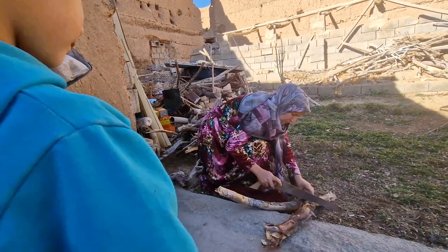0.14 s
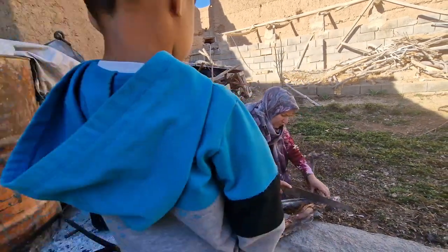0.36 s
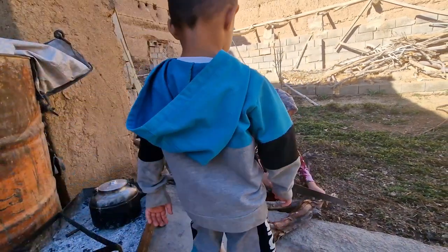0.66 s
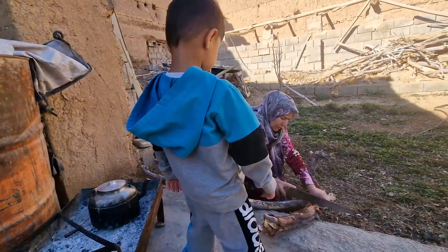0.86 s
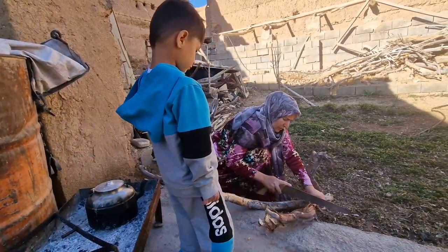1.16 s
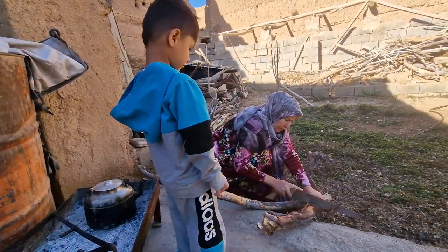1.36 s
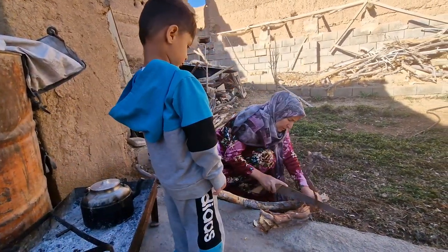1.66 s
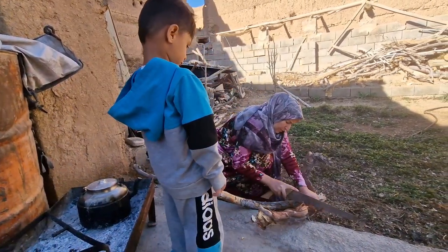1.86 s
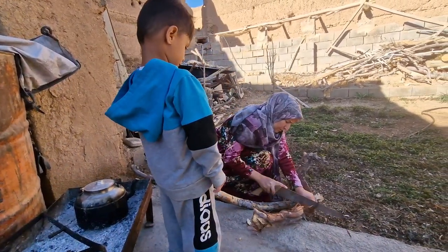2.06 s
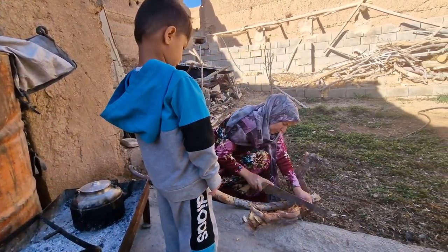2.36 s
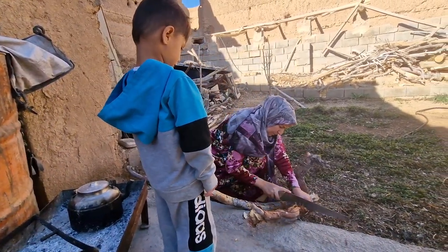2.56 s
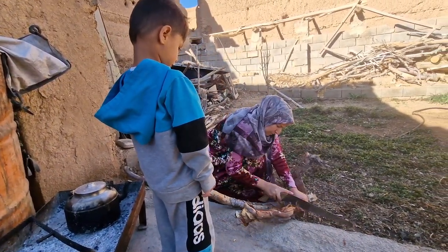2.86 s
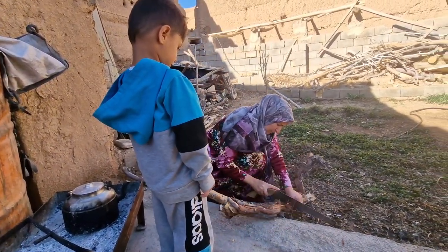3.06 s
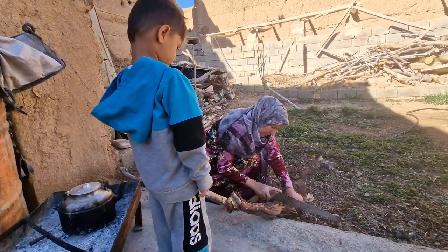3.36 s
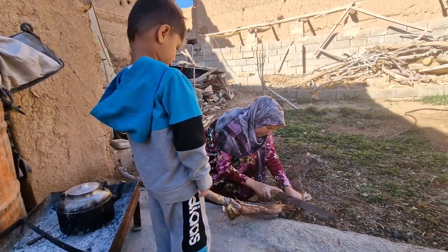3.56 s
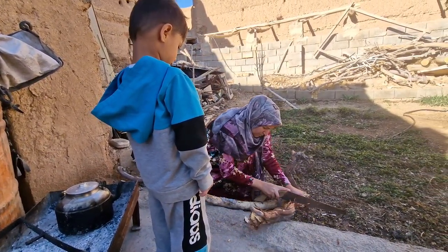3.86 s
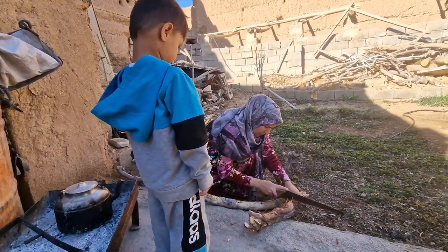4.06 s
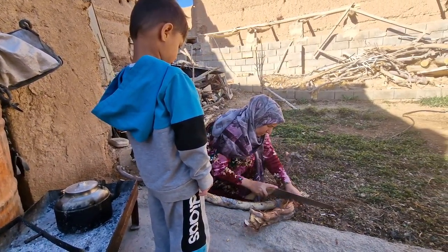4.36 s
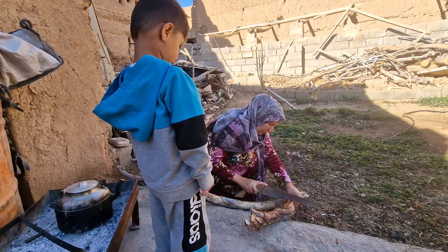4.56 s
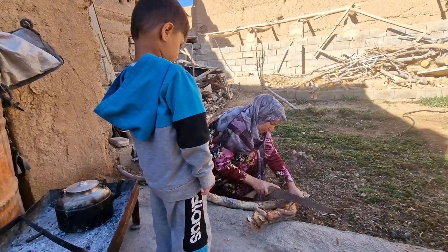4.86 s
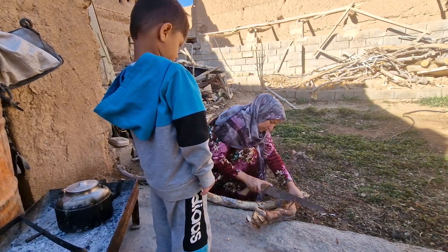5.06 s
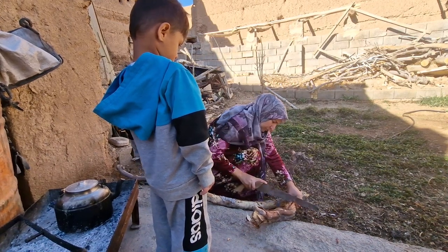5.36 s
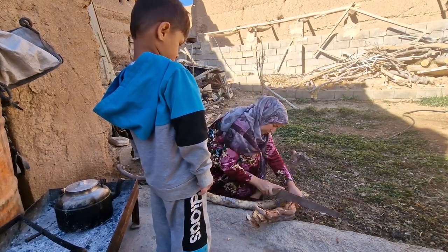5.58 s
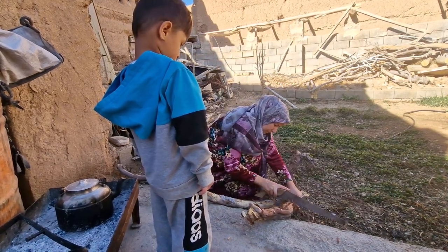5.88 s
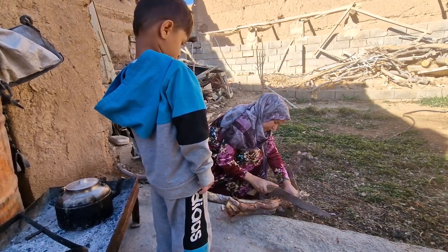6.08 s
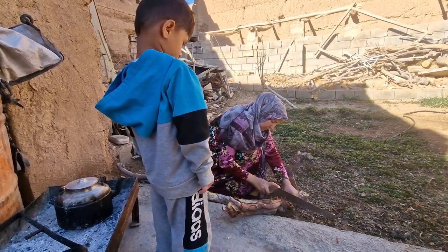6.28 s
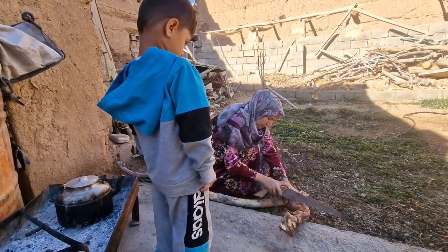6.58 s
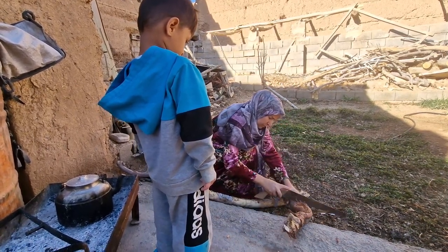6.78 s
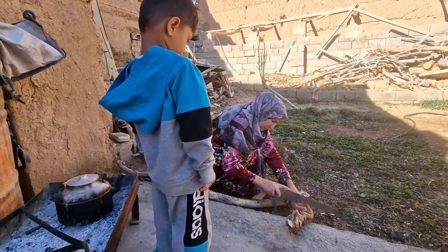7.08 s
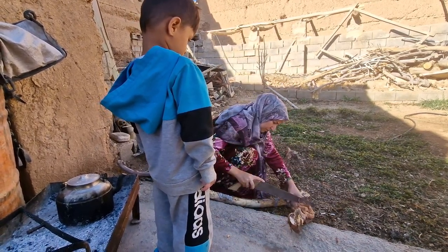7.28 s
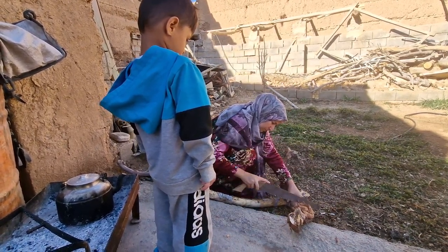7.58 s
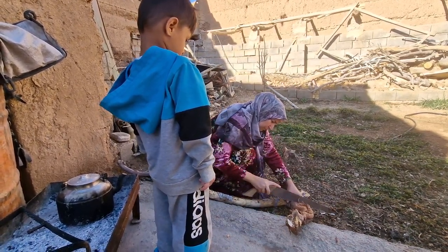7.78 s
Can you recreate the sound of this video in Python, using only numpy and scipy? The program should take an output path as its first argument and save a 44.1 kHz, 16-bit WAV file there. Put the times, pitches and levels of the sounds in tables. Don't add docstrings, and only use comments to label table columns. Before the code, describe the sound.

Close cloth rustle and bark ticks over a faint low wandering drone, then a hand saw rasps back and forth in a dry branch with sharp fibre cracks. It stops; the branch is shuffled and knocked on the slab. A second, firmer bout follows, then a cluster of hard woody knocks, a quiet gap and a final run of strokes. Walled yard, short reflections, small stereo microphone a few metres away.

```python
import sys
import numpy as np
from scipy import signal
from scipy.fft import rfft, irfft, next_fast_len
from scipy.io import wavfile
from scipy.ndimage import uniform_filter1d, map_coordinates

SR = 44100
rng = np.random.default_rng(int(sys.argv[2]) if len(sys.argv) > 2 else 0)


def dump(signal):
    limited = np.clip(np.atleast_2d(signal).T, -1, 1)
    pcm = np.round(limited * 32767).astype(np.int16)
    wavfile.write(sys.argv[1], SR, pcm)


def volts(x):
    e = np.asarray(x, float) / 20
    return 10 ** e


N = 349713

# start/s, length/s, blade level/dB, sawdust hiss over blade/dB
RETURN_STROKES = [
    (1.836, 0.16, -34.5, -0.5),
    (2.188, 0.19, -33.5, 0),
    (2.557, 0.16, -33.5, 2),
    (2.9, 0.13, -37, 1),
    (4.826, 0.18, -33, -2),
    (5.182, 0.18, -30.5, -5),
    (5.537, 0.14, -34.5, -1),
    (7.032, 0.24, -37.5, 0),
    (7.476, 0.19, -32, -1.5),
    (7.865, 0.2, -34, 1.5),
]


def unit(x):
    return x / np.sqrt(np.mean(x ** 2) + 1e-20)


def along(points, hz):
    f, v = np.transpose(points)
    return np.interp(np.log(hz + 1), np.log(f + 1), v)


def curves(rows):
    s, *cols = np.transpose(rows)
    return [np.interp(np.arange(N) / SR, s, c) for c in cols]


def wobble(rate):
    return map_coordinates(rng.standard_normal(4000 * 8), [np.arange(N) * rate / SR])


def filtered(x, response):
    m = next_fast_len(N + SR // 2)
    return irfft(rfft(x, m) * response(np.fft.rfftfreq(m, 1 / SR)), m)[..., :N]


def coloured(x, spectrum):
    return filtered(x, lambda hz: volts(along(spectrum, hz)))


def ringing(x, modes):
    def response(f):
        total = 0
        for k, (centre, width, db) in enumerate(modes):
            loss = 1j * f * width
            total = total + (-1) ** k * volts(db) * loss / (centre * centre - f * f + loss)
        return total
    return filtered(x, response)


def patchy(x, depth_db, size=(5, 9)):
    z = signal.stft(x, nperseg=512)[2]
    field = uniform_filter1d(rng.standard_normal(z.shape[1:]), size[0], axis=0)
    field = uniform_filter1d(field, size[1], axis=1)
    return signal.istft(z * volts(depth_db * unit(field)), nperseg=512)[1][:, :N]


def grit(bite_db, grain_db, bites, rate, ticks, tick_db):
    caught = (rng.random(N) < ticks / SR) * volts(tick_db * rng.random(N))
    swing = bite_db * np.tanh(bites / 2) * 2 + grain_db * wobble(rate)
    return unit(volts(swing) * (rng.standard_normal((2, N)) + caught))


def strokes(rows):
    speed, levels = np.zeros(N), np.full((3, N), -120.)
    cruise = 1
    for s, length, db, dust_db, lean, branch_db in rows:
        u = np.arange(round(length * SR)) / (length * SR)
        at = slice(round(s * SR), min(N, round(s * SR) + len(u)))
        skew = np.log(.5) / np.log(np.clip(lean, .15, .85))
        arm = np.tanh(cruise * np.sin(np.pi * u ** skew)) / np.tanh(cruise)
        speed[at] = arm[:at.stop - at.start]
        levels[:, at] = [[db + branch_db], [db], [db + dust_db]]
    return speed, levels


def motion(pushes, pulls):
    # share of the stroke before its loudest point, branch over blade/dB
    rows = [(*row, 0.63, -4.5) for row in pushes] + [(*row, 0.5, -6) for row in pulls]
    return strokes(sorted(rows))


def background():
    # t/s, level/dB
    drone_level = [(0.0, -88), (0.06, -63), (0.4, -72), (0.55, -44), (0.64, -66), (1.5, -53), (1.57, -45),
                   (1.61, -54.5), (3.03, -52.5), (3.07, -59), (5.37, -46.5), (5.43, -58.5), (5.5, -47.5),
                   (6.32, -53.5), (7.16, -47.5), (7.46, -54), (7.51, -49), (7.93, -63)]
    # f/Hz, level/dB
    hum_spectrum = [(20, -39), (45, -4), (72, 0), (110, -5), (200, -34.5)]
    # f/Hz, density/dB per Hz
    air_spectrum = [(59, -30.5), (100, -2), (135, -14.5), (219, -14.5), (322, -27), (415, -16.5),
                    (547, -52.5), (15000, -57.5), (16000, -55)]
    shaken_db, drift_db = 2.5, 1.5
    pitch_hz = 72 + 3.42 * wobble(9)
    line = np.sqrt(2) * np.sin(2 * np.pi * np.cumsum(pitch_hz) / SR)
    rumble = unit(coloured(rng.standard_normal((2, N)), hum_spectrum))
    return_speed = motion([], RETURN_STROKES)[0]
    level_db = curves(drone_level)[0] + shaken_db * return_speed + drift_db * wobble(4.04)
    drone = volts(level_db) * (volts(-2.0) * line * [[1], [.7]] + volts(-5.5) * rumble)
    return drone + volts(-67) * unit(coloured(rng.standard_normal((2, N)), air_spectrum))


def efforts():
    # loudest at t/s, swell/s, fade/s, rustle/dB, dull shuffle/dB
    moves = [(0.23, 0.36, 0.11, -45, -55.5), (0.327, 0.036, 0.14, -50, -67),
             (0.47, 0.18, 0.26, -59.5, -57.5), (0.7, 0.26, 0.16, -60, -77), (0.878, 0.16, 0.22, -43, -66),
             (1.12, 0.13, 0.058, -58, -83), (1.196, 0.12, 0.063, -36.5, -60), (2.7, 1.5, 0.51, -50, -62),
             (3.04, 0.35, 0.084, -48.5, -47), (3.21, 0.081, 0.059, -41, -55), (3.36, .1, .1, -74, -68),
             (3.6, 0.3, 0.075, -51, -62), (3.66, 0.061, 0.092, -48.5, -52.5),
             (3.75, 0.12, 0.14, -53, -53.5), (3.91, 0.31, 0.04, -49, -48.5), (4.03, 0.3, 0.81, -53, -59.5),
             (4.3, 0.54, 0.08, -83, -57.5), (4.38, 0.027, 0.12, -54, -50.5), (5.7, 1.1, 0.18, -53.5, -46.5),
             (5.906, 0.026, 0.13, -44, -37.5), (6.3, 0.13, 0.18, -62, -57), (6.82, .1, 0.044, -85, -59),
             (6.9, 0.034, .5, -56.5, -58.5), (7.5, 0.53, 1.5, -57, -52)]
    fade_db = 19.5
    t, power = np.arange(0, N / SR, .002), 0
    for s, swell, fade, rustle_db, shuffle_db in moves:
        loss_db = fade_db * np.maximum((s - t) / swell, (t - s) / fade)
        scuff_db = rustle_db - 8.5 - 0.37 * (shuffle_db - rustle_db)
        power = power + volts(np.array([[rustle_db], [shuffle_db], [scuff_db]]) - loss_db) ** 2
    return curves(np.vstack([t, np.sqrt(power)]).T)


def handling():
    # f/Hz, density/dB per Hz
    rustle_spectrum = [(710, -12), (1200, -14.5), (1490, -11), (2520, -9.5), (3300, -9.5), (6160, -6),
                       (9000, -8), (11700, -24.5), (19800, -120)]
    # f/Hz, density/dB per Hz
    shuffle_spectrum = [(65, -26.5), (110, -5.5), (176, -5.5), (307, -9.5), (481, -9.5), (1230, -24.5),
                        (1500, -54), (1950, -47), (3300, -120)]
    # f/Hz, density/dB per Hz
    scuff_spectrum = [(5290, -49), (9000, -13), (10400, -12.5), (13300, 5), (15100, 0), (16000, -9)]
    rustle_gain, shuffle_gain, scuff_gain = efforts()
    clumps = wobble(90)
    crackle = grit(2.6, 1.8, clumps, 700, ticks=70, tick_db=25)
    drag = grit(1.8, 2.2, clumps, 150, ticks=30, tick_db=20)
    rustle = rustle_gain * unit(patchy(coloured(crackle, rustle_spectrum), 2.8))
    scuff = scuff_gain * unit(coloured(crackle, scuff_spectrum))
    shuffle = shuffle_gain * unit(patchy(coloured(drag, shuffle_spectrum), 2.2))
    return rustle + shuffle + scuff


def knocks():
    # t/s, peak level/dB, note f/Hz, rattle over note/dB, thud over note/dB
    bumps = [(0.426, -39.5, 298, -9.5, -13), (0.537, -41.5, 280, -17, 7), (2.078, -24.5, 367, -12, -20),
             (2.679, -33, 626, 15, -10), (2.999, -24, 945, -11, -23), (3.037, -27, 393, -9, -14),
             (3.75, -35, 280, -3, -24), (4.382, -31, 423, -16, -27), (5.614, -17.5, 960, -15, -14),
             (5.629, -16, 287, -16, -12.5), (5.693, -23.5, 340, -9.5, -10.5), (5.92, -28, 564, -1.5, -33),
             (5.949, -26.5, 533, -8, -18), (5.99, -27.5, 1000, -0.5, -32), (6, -21.5, 986, -6.5, -11.5),
             (6.031, -24, 303, -11.5, -29), (6.066, -30, 383, -15, -11.5), (6.093, -28.5, 317, -19, -13),
             (6.291, -43.5, 270, -10, -4.5), (6.534, -25.5, 575, -11, -5), (6.572, -25, 270, -9, -5),
             (6.618, -34.5, 274, -5.5, -0.5)]
    # f/Hz, width/Hz, level/dB
    stub_modes = [(620, 250, -3), (1150, 300, -3), (1590, 300, 0), (1990, 350, -2), (3500, 700, -12)]
    body, rattle, t = np.zeros(N + SR), np.zeros((2, N + SR)), np.arange(SR // 5) / SR
    for s, db, hz, rattle_db, thud_db in bumps:
        thud_hz = 75 if s < 5 else 146.3
        at = slice(round(s * SR), round(s * SR) + len(t))
        note = volts(db - 60 * t / 0.025) * np.sin(2 * np.pi * hz * t)
        thud = volts(db + thud_db + 9.5 - 60 * t / 0.038) * np.sin(2 * np.pi * thud_hz * t)
        body[at] += note * (1 - np.exp(-t / 0.00092)) + thud * (1 - np.exp(-t / 0.0057))
        shake = volts(db + rattle_db - 60 * t / 0.018) * (1 - np.exp(-t / 0.0015))
        rattle[:, at] += shake * np.sign(rng.standard_normal((2, len(t))))
    return body[:N] + volts(20) * ringing(rattle[:, :N], stub_modes)


def snaps():
    # t/s, peak level/dB, crack pitch f/Hz
    fibres = [(1.1432, -11, 3660), (1.1776, -20, 5900), (1.498, -27.5, 3870), (1.5936, -22.5, 3680),
              (1.95, -19.5, 7360), (2.2164, -20, 6860), (3.0383, -31.5, 2980), (2.3303, -10, 6900),
              (2.3396, -16.5, 7850), (2.3414, -32, 7050), (2.36, -22, 7050), (2.364, -8.5, 5600),
              (2.3671, -15, 5670), (2.5783, -23, 6700), (2.6646, -19, 6200), (2.6774, -9.5, 3340),
              (2.6831, -15.5, 3350), (2.943, -24, 6820), (2.952, -8, 6250), (2.958, -18, 5700),
              (3.0091, -19.5, 7600), (5.694, -26.5, 6740), (5.916, -29, 6100), (5.919, -33, 7040),
              (5.9478, -30.5, 4200), (6.0002, -23.5, 5530), (6.005, -27, 2960), (6.536, -25.5, 7480),
              (7.222, -25.5, 4900), (7.497, -33, 6100)]
    # t/s, peak level/dB
    flakes = [(0.181, -38), (0.252, -37), (0.3286, -43), (0.832, -35), (0.875, -35), (0.9175, -36),
              (0.946, -37.5), (0.986, -34.5), (1.4555, -32), (1.855, -31), (3.081, -42), (3.247, -31.5),
              (3.404, -48), (3.5488, -40.5), (3.645, -31.5), (3.7494, -31), (4.0094, -32), (4.351, -39.5),
              (4.3774, -37.5), (4.5151, -44), (4.8374, -35), (5.913, -28), (6.0303, -34.5), (6.0645, -42),
              (6.233, -43), (6.83, -51), (6.935, -39), (6.573, -33.5), (5.0275, -47), (6.9917, -38)]
    # f/Hz, density/dB per Hz
    crack_spectrum = [(590, -54), (1000, -21), (1630, -13), (2680, -9), (3420, -10.5), (5020, -12),
                      (7530, 1), (9490, -12.5), (15100, -12.5), (16000, -18)]
    tick_hz, tick_spread, splinter_t60 = 5900, 0.15, 0.044
    bursts, pitched, t = np.zeros((2, N + SR)), np.zeros((2, N + SR)), np.arange(SR // 10) / SR
    pitched_flakes = [(s, db, tick_hz * np.exp(tick_spread * rng.standard_normal())) for s, db in flakes]
    for s, db, hz in fibres + pitched_flakes:
        spike, splinter = 1.8 * volts(-60 * t / .006), volts(-9 - 60 * t / splinter_t60)
        shape = (spike + splinter) * (1 - np.exp(-t / .0005))
        at = slice(round(s * SR), round(s * SR) + len(t))
        bursts[:, at] += volts(db) * shape * np.sign(rng.standard_normal((2, len(t))))
        ring = np.sin(2 * np.pi * hz * t + rng.uniform(0, 2 * np.pi, (2, 1)))
        pitched[:, at] += volts(db - 60 * t / 0.057) * shape * ring
    return volts(8) * coloured(bursts[:, :N], crack_spectrum) + volts(-4.5) * pitched[:, :N]


def saw():
    # start/s, length/s, blade level/dB, sawdust hiss over blade/dB
    cutting_strokes = [(1.232, 0.23, -44, 7), (1.457, 0.19, -39, 2.5), (1.662, 0.17, -37.5, -2.5),
                       (2.033, 0.16, -37, -3), (2.372, 0.18, -37, 0.7), (2.733, 0.16, -35, -1.5),
                       (4.427, 0.18, -48.5, 1), (4.625, 0.19, -38, -3.5), (4.993, 0.18, -34, -3.5),
                       (5.367, 0.16, -32.5, -4), (5.735, 0.14, -37, -2.5), (6.85, 0.17, -59, 5),
                       (7.261, 0.2, -35, -4.5), (7.664, 0.2, -33, -2.5)]
    # f/Hz, width/Hz, level/dB
    branch_modes = [(140, 125, -4), (280, 157, -1), (487, 240, -1.5), (646, 130, -0.5), (868, 280, -12.5)]
    # f/Hz, width/Hz, level/dB
    blade_modes = [(1037.4, 110, 1), (1537, 73, 2), (1885, 237, -1), (2390, 620, -6), (3200, 790, -6.5),
                   (4290, 730, -7.5)]
    # f/Hz, density/dB per Hz
    dust_spectrum = [(1470, -87), (2500, 7), (3380, -5), (5390, 4.5), (7130, 6.5), (11400, -4.5),
                     (13300, 2.5), (15200, 1), (16000, -32.5)]
    speed, levels = motion(cutting_strokes, RETURN_STROKES)
    bites, pressure = wobble(230), 0.47 * wobble(35)
    branch_grit = grit(3.4, 3.9, bites, 500, ticks=300, tick_db=7.5)
    blade_grit = grit(1.2, 1.9, bites, 1300, ticks=430, tick_db=22.5)
    dust_grit = grit(2.2, 1.03, bites, 1300, ticks=600, tick_db=15.5)
    branch = unit(patchy(ringing(branch_grit, branch_modes), 0.74)) * speed ** 0.97
    blade = unit(patchy(ringing(blade_grit, blade_modes), 2.45)) * speed ** 1.27
    dust = unit(patchy(coloured(dust_grit, dust_spectrum), 1.8)) * speed ** 1.14
    gains = volts(levels + pressure + [[.7], [.8], [.9]])
    return (gains[:, None] * [branch, blade, dust]).sum(axis=0)


def yard(x):
    # f/Hz, t60/s
    decay = [(200, 0.28), (2000, 0.15), (10000, 0.07)]
    hz, t, z = signal.stft(rng.standard_normal((2, SR // 3)), SR, nperseg=256)
    fading = volts(-60 * t / along(decay, hz)[:, None])
    tail = signal.istft(z * fading, SR, nperseg=256)[1]
    late = np.pad(x, ((0, 0), (300, 0)))
    return signal.fftconvolve(late, tail / np.linalg.norm(tail[0]), axes=1)[:, :N]


def ports(pair):
    # f/Hz, correlation
    likeness = [(40, 0.62), (130, 1), (300, 0.9), (700, 0.83), (1400, 0.66), (2800, 0.22), (5000, 0.33),
                (9000, 0.12), (15000, 0.047)]
    # f/Hz, left minus right/dB
    tilt = [(60, -4.5), (110, -4.5), (200, 1.5), (380, -2), (700, -1.5), (1290, 3), (2380, 1.5), (4400, -8),
            (8120, -3), (15000, -6)]
    # f/Hz, left lead/rad
    lead = [(500, 0), (1210, -.2), (1800, -.8), (2760, -3), (4130, -2.5), (4910, -.9), (7750, .2)]

    def blend(hz):
        angle = np.arccos(np.clip(along(likeness, hz), -1, 1)) / 2
        return np.array([np.cos(angle), np.sin(angle)])

    def offset(hz):
        half = volts(along(tilt, hz) / 2) * np.exp(.5j * along(lead, hz))
        return np.array([half, 1 / half])

    mid, side = filtered(pair, blend)
    return filtered(np.array([mid + side, mid - side]), offset)


def scene():
    work = saw() + snaps() + knocks()
    return ports(work + volts(-14.5) * yard(work) + handling() + background())


def band_limit(x):
    return signal.sosfilt(signal.butter(12, 16980, fs=SR, output="sos"), x)


def record(dry):
    # f/Hz, level/dB
    capsule = [(20, 1), (2200, 0.5), (2750, -0.5), (3300, 3), (8500, -3.5), (10800, -1), (12500, -1),
               (15800, 1), (16250, -15), (16400, -51.5), (20000, -60)]
    return band_limit(coloured(dry, capsule))


dry = scene()
out = record(dry)
dump(out)
```